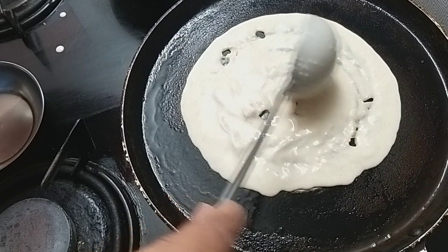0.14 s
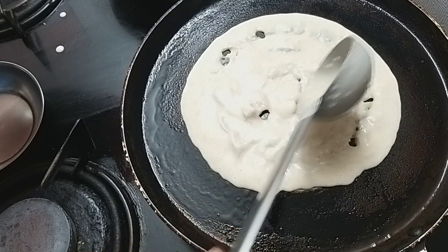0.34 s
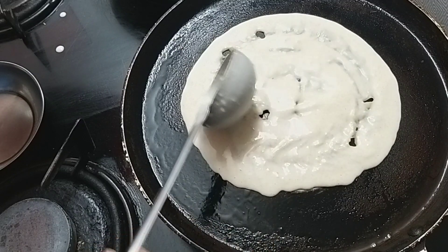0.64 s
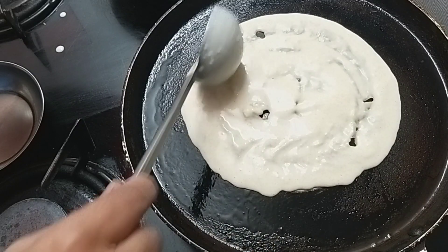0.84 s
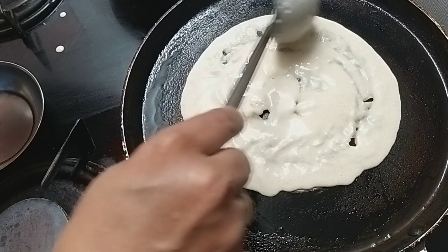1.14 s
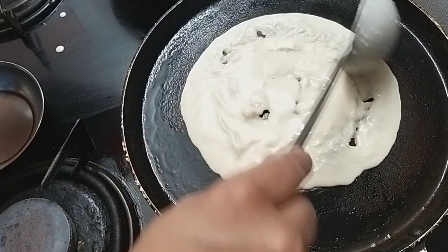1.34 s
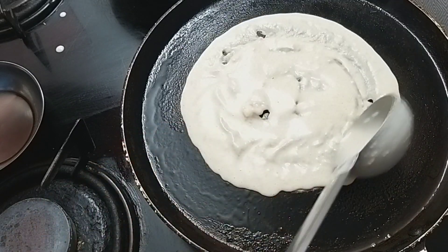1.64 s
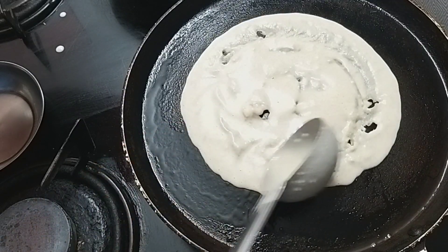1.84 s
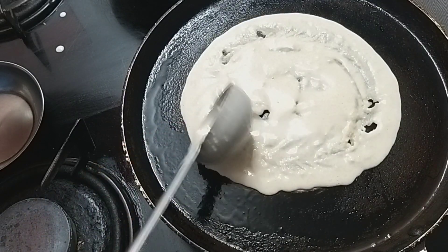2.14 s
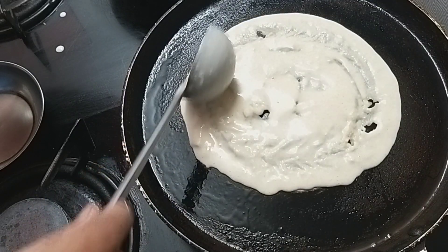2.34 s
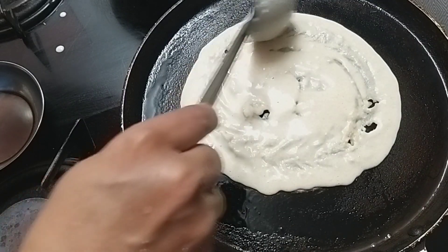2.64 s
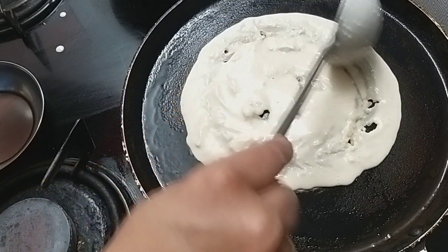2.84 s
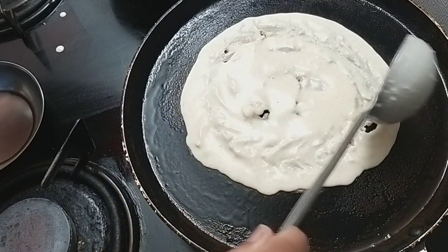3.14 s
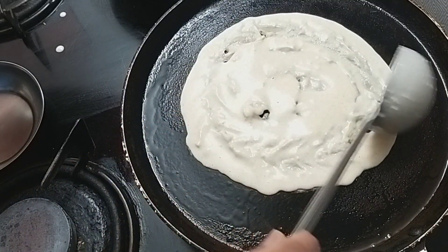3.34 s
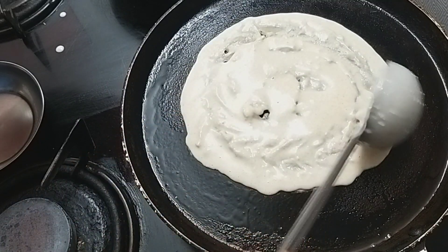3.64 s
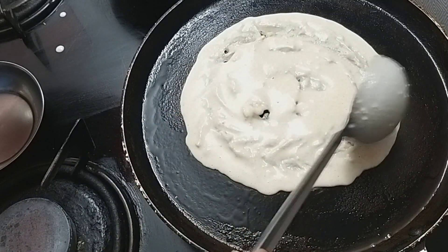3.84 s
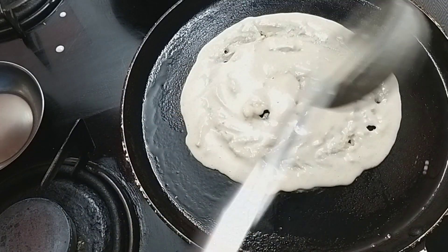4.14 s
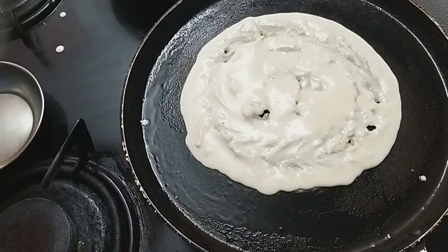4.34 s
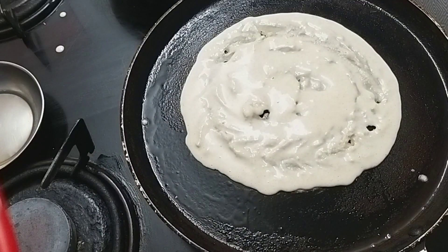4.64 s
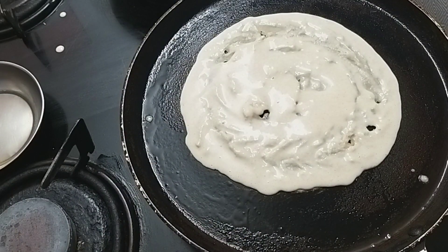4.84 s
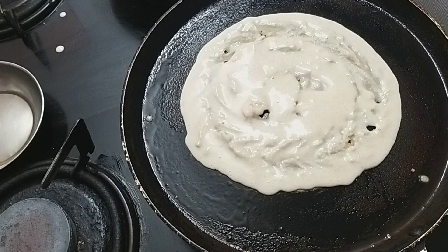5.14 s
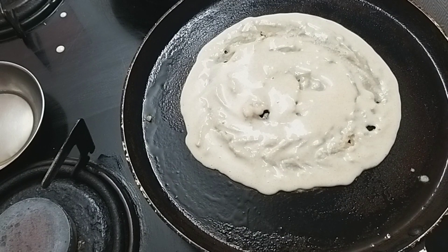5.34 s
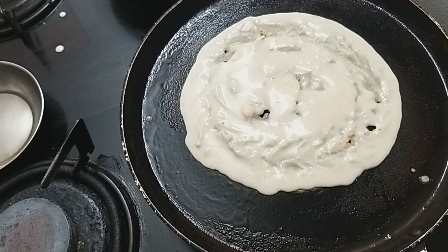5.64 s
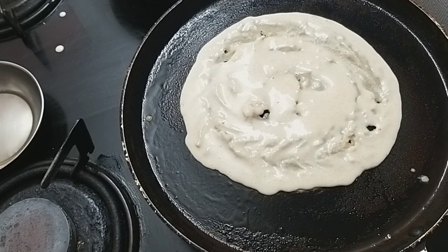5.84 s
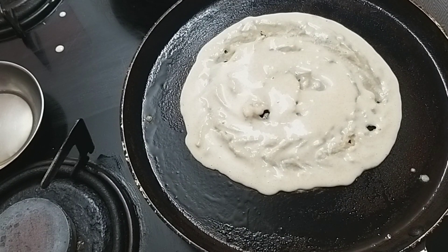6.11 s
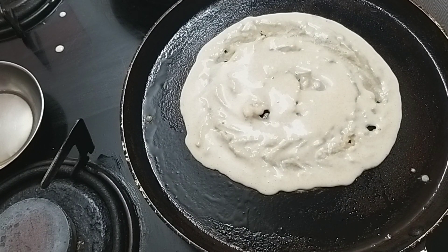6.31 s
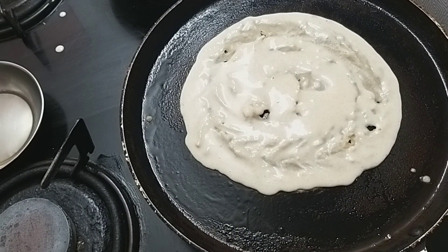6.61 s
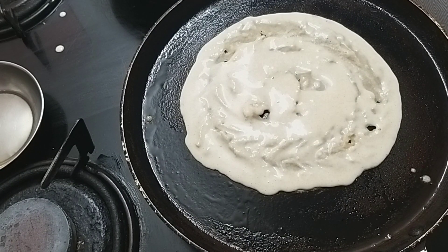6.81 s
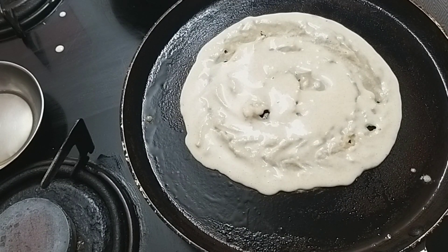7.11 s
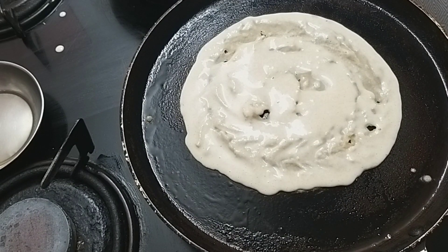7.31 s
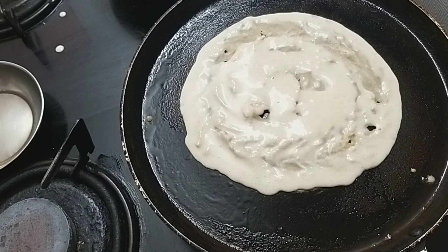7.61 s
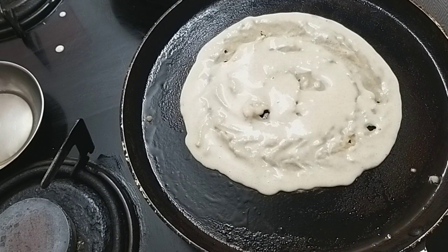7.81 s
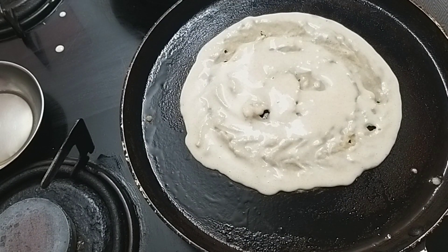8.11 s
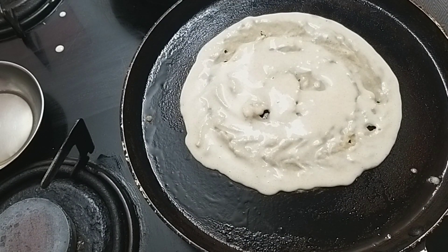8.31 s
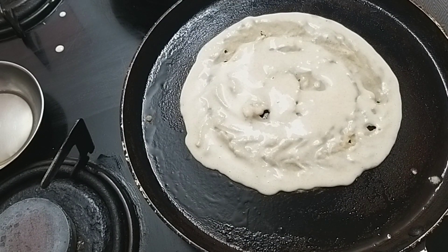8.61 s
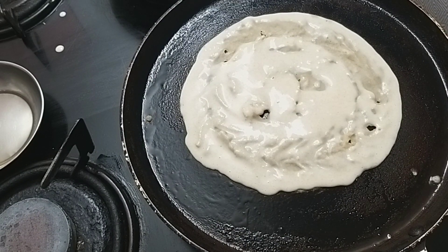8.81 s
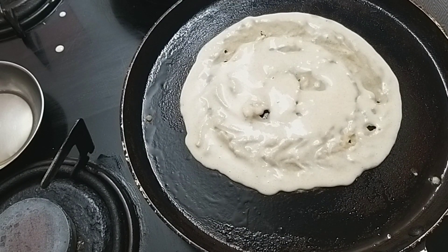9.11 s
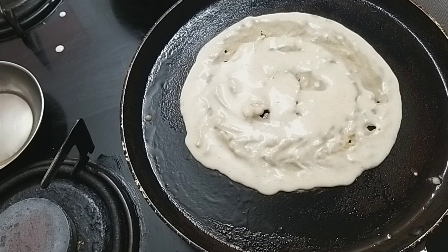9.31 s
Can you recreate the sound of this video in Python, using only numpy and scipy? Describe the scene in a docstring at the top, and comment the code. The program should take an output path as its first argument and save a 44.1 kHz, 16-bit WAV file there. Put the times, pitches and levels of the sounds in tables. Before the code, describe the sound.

A near stereo microphone catches strong, crisp sizzling and bubbling batter, with faint wet ladle smears and brief hoarse steam hisses in the first few seconds. The frying then weakens, leaving popping, spitting oil more exposed. From midway, irregular hollow clacks, small steel ticks and dull counter thumps sound nearby in the lightly reverberant kitchen. A quiet low rush continues underneath, and a much louder knock lands at the very end.

```python
"""Batter fries on a hot oiled griddle, close to the microphone in a small kitchen, as a steel ladle spreads it.
Steam bursts through the oil: clicks and chirps make a dense fizz, and clustered clicks make short spurts.
The spurts stand out as the batter sets and the fizz dies down; sharp spits of oil are noise bursts.
The ladle smears (filtered clicks) and traps rasping steam (swept noise), then is taken away.
Then things are knocked and put down on the counter (decaying modes), over the kitchen's low rush of noise."""
import sys
import numpy as np
from scipy import signal
from scipy.fft import rfft, irfft
from scipy.io import wavfile
from scipy.ndimage import uniform_filter1d

SR = 44100
rng = np.random.default_rng(int(sys.argv[2]) if len(sys.argv) > 2 else 0)


def transcribe(signal):
    """Save signal, clipped to [-1, 1], as a 16-bit WAV file at the path in sys.argv[1]."""
    frames = np.atleast_2d(signal).T
    limited = np.clip(frames, -1, 1)
    pcm = np.round(limited * 32767).astype(np.int16)
    wavfile.write(sys.argv[1], SR, pcm)


N = 417178  # samples
TIME = np.arange(N) / SR  # seconds

# Steam flow out of the batter; only its rise or fall from STEADY_STEAM_DB is used.
# Each row: time in seconds, flow as a level in dB.
STEAM_FLOW = [(0, -38), (.12, -37), (.3, -39), (.8, -39.5), (.95, -41), (1.02, -36.5), (1.21, -41),
              (1.5, -40), (1.76, -35.5), (2.2, -38), (2.62, -34.5), (3.25, -38), (3.7, -42), (3.83, -43.5),
              (3.91, -42.5), (4.02, -43.5), (4.36, -46.5), (4.45, -39), (4.7, -40.5), (4.8, -44.5),
              (5.5, -42.5), (6.45, -45.5), (6.72, -52), (6.9, -46.5), (7.15, -49), (7.33, -48), (7.42, -52),
              (7.8, -48), (7.95, -49.5), (8.3, -53), (8.88, -52.5), (9.1, -47), (9.42, -43.5)]
# Gain of the wet boiling at steady steam. Each row: time in seconds, gain in dB.
BOILING_GAIN = [(0, -48.5), (1.4, -44.5), (1.55, -44.5), (1.8, -45.5), (2.1, -44.5), (3.3, -44.5),
                (4.35, -47), (4.5, -48.5), (5.3, -48), (6.3, -48), (9.42, -46.5)]
# Tone of each frying layer, as filters. Each row: frequency in Hz, relative gain in dB.
FIZZ_TONE = [(1500, -22), (3500, -8), (5000, -4), (6200, -5), (7500, -1.5), (10000, -3), (12800, 0),
             (14500, -1.7), (16000, -1.7)]
BOIL_TONE = [(200, -26.5), (400, -18.5), (510, -4.5), (660, -15.5), (950, -4), (1290, -4), (1500, 0),
             (2200, 0), (3300, 2.5), (4500, 2.5), (6500, -7), (12000, -40)]
SPURT_TONE = [(400, -27), (1200, -18.5), (3300, -8.5), (6000, -6), (7500, -2.5), (10000, -3.3),
              (12800, -.5), (16000, -3)]
SNAP_TONE = [(1500, -28), (4000, -16), (6000, -9), (7500, -5.5), (10000, -7.5), (12800, -1), (16000, -7)]
SPLUTTER_TONE = [(250, -38), (700, -15), (1400, -7), (3500, 2.5), (5500, 4.5), (9000, -4), (16000, -42)]
# Bands in which a spurt is stronger or weaker. Each row: lower edge in Hz, upper edge in Hz.
PATCHY_BANDS = [(900, 2200), (2200, 4400), (4400, 7500), (7500, 11000), (11000, 17000)]
# Loudest spits of oil, before SPIT_GAIN_DB. Each row: time in seconds, snap energy as a level over 1 ms in dB,
# snap length in seconds (SPIT_CORE scales its decay), wet splutter relative to the snap in dB.
OIL_SPITS = [(0.096, -26, 0.00076, -17.0), (0.1371, -22.5, 0.00068, -15.0), (0.214, -31, 0.00044, -13.0),
             (0.306, -29, 0.00079, -13.0), (0.613, -38, 0.00036, -18.5), (0.7073, -25, 0.00175, -18.0),
             (0.774, -24.5, 0.0012, -3.5), (0.908, -32, 0.00016, -8.0), (1.1398, -34, 0.00039, -6.5),
             (1.372, -25, 0.001, -9), (1.395, -25.5, 0.0018, -22.0), (1.4673, -31, 0.00052, -4),
             (1.634, -22.5, 0.00096, -8), (1.752, -24.5, 0.00062, -12), (1.9591, -27, 0.00037, -8.0),
             (2.114, -27, 0.00082, -22.0), (2.552, -25, 0.00058, -22), (2.649, -24, 0.00037, -2),
             (3.3787, -29, 0.00067, -13.0), (3.442, -32, 0.00021, -22.0), (3.546, -26.5, 0.00063, 3),
             (3.5746, -38, 0.0003, -10.0), (3.731, -31, 0.00071, -10.0), (3.8401, -37, 0.00051, -22.0),
             (3.894, -31, 0.00067, -8.0), (3.907, -25.5, 0.0016, -11), (3.978, -36, 0.00053, -12.0),
             (4.07, -28, 0.00056, -5), (4.126, -25.5, 0.0015, -7), (4.139, -30, 0.00116, -12.0),
             (4.2764, -32, 0.00091, -4), (4.293, -35, 0.0012, -4), (4.508, -21, 0.00041, -24),
             (4.5132, -30, 0.00028, -17.0), (4.599, -31, 0.00088, 1), (4.696, -27, 0.00037, -1),
             (4.766, -28, 0.0016, -1), (4.872, -27.5, 0.00056, -7.0), (4.929, -27.5, 0.00065, -15),
             (4.955, -33.5, 0.00035, 1.5), (5.018, -32, 0.00098, -4), (5.0245, -28.0, 0.00096, -4.0),
             (5.0764, -35, 0.00038, -4), (5.115, -32.5, 0.00036, -22.0), (5.13, -29.5, 0.0011, -5),
             (5.183, -34, 0.00087, -3), (5.2954, -28.5, 0.00085, -2.5), (5.32, -39, 0.00146, -16.0),
             (5.339, -27, 0.00063, -13), (5.405, -32, 0.00059, -10.0), (5.436, -37, 0.00017, 0),
             (5.4871, -28.5, 0.00082, -0.5), (5.531, -28.5, 0.001, -2), (5.584, -33, 0.00056, -11),
             (5.603, -31, 0.00051, -20), (5.6776, -33, 0.00087, -21.0), (5.745, -31.5, 0.00073, 7),
             (5.784, -32.0, 0.00052, -22.0), (5.8231, -26, 0.0012, -10), (5.959, -31, 0.00033, -4.0),
             (5.983, -31.5, 0.00032, -20.0), (6.0214, -28.5, 0.00067, -3.5), (6.0422, -23, 0.0011, -5.0),
             (6.0532, -38, 0.00049, -10.0), (6.105, -23, 0.0011, -22), (6.12, -38, 0.00045, -11),
             (6.14, -34, 0.00047, -12), (6.187, -32.5, 0.00031, -22.0), (6.233, -21.5, 0.0005, -10),
             (6.2475, -29, 0.00038, -6), (6.2996, -28.5, 0.00051, -0.5), (6.328, -33, 0.00015, -17.0),
             (6.3415, -30, 0.00022, -2), (6.383, -32, 0.00084, -19.0), (6.431, -30.5, 0.00068, -9),
             (6.557, -33.5, 0.00177, -3), (6.591, -32, 0.001, -15.0), (6.602, -30, 0.00065, -12.0),
             (6.607, -33.0, 0.0011, -19.0), (6.6426, -31, 0.00012, -20.0), (6.655, -31, 0.00038, -8),
             (6.667, -31.5, 0.00198, -6), (6.865, -26.0, 0.00034, -9), (6.877, -33.0, 0.00057, -15.0),
             (6.9034, -33, 0.00021, -13), (6.915, -26, 0.00057, -12), (6.9374, -32, 0.00078, -24),
             (6.9476, -25.5, 0.00032, -13), (6.957, -32.0, 0.0011, -22.0), (6.9843, -32.5, 0.00051, 1.5),
             (7.0336, -36.5, 0.00027, 0), (7.088, -30, 0.00048, -2), (7.0988, -37, 0.00035, -7),
             (7.1159, -35, 0.00104, -3), (7.1263, -31, 0.00051, -4), (7.247, -28.5, 0.00053, -13),
             (7.3175, -35, 0.00059, -22.0), (7.331, -36.5, 0.00089, 4), (7.3393, -36, 0.00086, -9.0),
             (7.435, -38, 0.00021, -17.0), (7.497, -33, 0.00032, -7), (7.6551, -34.5, 0.0008, -17.0),
             (7.6917, -36, 0.00093, -10.0), (7.714, -30, 0.00041, -6), (7.759, -33, 0.00051, -2),
             (7.78, -34, 0.00023, -6), (7.811, -34, 0.00029, 1.5), (7.838, -29, 0.00075, -5),
             (7.849, -31, 0.00048, -14), (7.8651, -35, 0.00077, -14), (7.993, -34.5, 0.00046, -14),
             (8.029, -35, 0.00078, -13.0), (8.033, -34, 0.0005, -9), (8.059, -32, 0.00074, -15),
             (8.124, -38, 0.00047, -22.0), (8.16, -32, 0.00086, -10), (8.267, -33.5, 0.00029, -15),
             (8.3533, -30, 0.0021, -4), (8.3658, -36, 0.00041, -7), (8.374, -34, 0.00133, -13.0),
             (8.469, -35.5, 0.00056, -1), (8.492, -34, 0.0018, -2), (8.5076, -31, 0.0012, 1.5),
             (8.525, -28, 0.0002, -7), (8.5517, -26.5, 0.00071, -8), (8.589, -31.0, 0.00049, -1),
             (8.6144, -33, 0.00105, -18.0), (8.656, -31, 0.00074, -13), (8.6995, -26.5, 0.00056, -6),
             (8.713, -31, 0.0004, -15.0), (8.926, -33.5, 0.00072, -16.0), (8.963, -26.0, 0.00025, -21),
             (8.9715, -31, 0.00036, -12.0), (9.0489, -41, 0.0006, -22.0), (9.096, -30, 0.00112, -15.0),
             (9.1678, -33, 0.0013, -5), (9.343, -23.5, 0.00082, -7), (9.3928, -32, 0.00041, -7)]
# Ladle strokes through the batter. Each row: middle in seconds, length in seconds, level in dB.
LADLE_STROKES = [(0.186, 0.11, -52.5), (0.47, 0.26, -60), (0.76, 0.066, -45.5), (1.054, 0.049, -49.5),
                 (1.423, 0.18, -44.5), (1.587, 0.06, -48.5), (1.8, 3.7, -56), (2.118, 0.13, -45),
                 (2.208, 0.11, -46), (2.54, 0.69, -56), (3.003, 0.11, -47.5), (3.919, 0.038, -51)]
# Tone of the ladle's smear, as a filter. Each row: frequency in Hz, relative gain in dB.
SMEAR_TONE = [(150, -30.5), (270, 1.5), (420, -1.5), (510, 9), (640, -1.5), (900, 2.5), (1250, 1),
              (2000, -4), (4000, -38)]
# Steam trapped under the bowl. Each row: start in seconds, attack in seconds, time from start to release in
# seconds, release time constant in seconds, starting resonance in Hz, sag in octaves per second,
# level in dB before the rasp.
TRAPPED_STEAM = [(0.106, 0.0092, 0.024, 0.014, 3460, .4, -37.5),
                 (1.545, .015, 0.29, 0.03, 4350, 1.1, -35.5), (1.95, .01, 0.076, 0.043, 3750, 0.38, -42.5),
                 (2.282, .01, 0.14, 0.081, 2350, .4, -45), (2.536, .02, 0.06, 0.26, 3426, .4, -39.5)]
# Blows on the counter. Each row: time in seconds, clack peak in dB, body pitch in Hz, tilt of the body's modes
# in dB per octave (higher is harder), then gains in dB of the body, the steel ring and the counter's thump.
COUNTER_KNOCKS = [(5.5408, -22, 665, 5, -35, -49, -34), (5.5472, -21, 819, 1, -31, -50, -25.5),
                  (5.7314, -18.5, 617, 6, -33.5, -36.5, -36), (5.838, -48, 280, 2, -50, -66, -46),
                  (6.2123, -18, 759, 0, -22.5, -50, -37), (6.6988, -32, 266.5, 7.5, -36.5, -67, -54),
                  (6.712, -44, 215, -7, -39, -68, -35), (6.768, -41, 239, 3, -45, -66, -43),
                  (6.9734, -21.5, 910, 3, -47, -55, -50), (7.005, -33, 521, 3, -48, -53, -58),
                  (7.2409, -18, 396.4, -6, -20.5, -53, -35.5), (7.2747, -25, 423, -1, -44, -60, -62),
                  (7.3302, -30, 388, -1, -35, -67, -60), (7.429, -30, 804, -5, -38.5, -55, -53),
                  (7.5439, -16, 493, 1.5, -25, -40.5, -42.5), (7.762, -52, 411, -14, -42.5, -68, -56),
                  (8.1616, -28.5, 800, 0, -39, -58, -43), (8.19, -28, 520, 0, -45, -45, -48),
                  (8.8532, -47, 773, -10, -47, -68, -42), (9.1232, -32, 279, 6, -48, -65, -42),
                  (9.4525, -0.5, 815, 3, -19, -19, -31)]
# Tone of the contact clack, as a filter. Each row: frequency in Hz, relative gain in dB.
CLACK_TONE = [(40, -47), (120, -21), (300, 1), (550, -17), (820, 6), (1100, 0.5), (1500, 3.5), (2100, -1),
              (3000, -4), (5000, -7.5), (10000, -10), (16000, -52)]
# Modes of a thing put down. Each row: multiple of its pitch, level in dB, t60 in seconds.
VESSEL_MODES = [(.6, -10, .07), (.75, -10.5, .07), (.93, -7, .08), (1, 0, .125), (1.09, -9, .14),
                (1.36, -9, .11), (1.62, -15, .14), (1.95, -18, .14), (2.3, -17, .12), (2.8, -21, .11),
                (3.2, -19, .13), (3.9, -24, .1)]
# Modes of the steel ladle and cup. Each row: frequency in Hz, level in dB, t60 in seconds.
STEEL_MODES = [(1104, -9, 0.18), (1320, -14, 0.042), (1670, -25, 0.039), (1660, -18, 0.057),
               (1740, -1, 0.033), (2087, -3.5, 0.087), (2023, 5.5, 0.032), (2280, 1.5, 0.037),
               (2560, -15, 0.11)]
# Modes of the counter, all sounded at 0.98 of the listed pitch.
# Each row: nominal frequency in Hz, level in dB, t60 in seconds.
COUNTER_MODES = [(122, -17, 0.83), (156.3, 2, 0.28), (182, -3, 0.24), (215, -8, 0.17), (276, -9, .09)]
# Tone of the burner and room, as a filter. Each row: frequency in Hz, relative gain in dB.
KITCHEN_TONE = [(25, -7.5), (60, -3.5), (110, 3), (160, -3), (230, -9.5), (400, -10.5), (510, -9.5),
                (700, -10), (1000, -10), (1280, -3.5), (1600, -15), (4000, -24.5), (16000, -53)]

# layer levels in dB at steady steam, before the room; a slope is the dB gained per dB more steam
STEADY_STEAM_DB = -44
FIZZ_DB, FIZZ_SLOPE = -42.5, 1.21
CRACKLE_DB, CRACKLE_SLOPE = -49, .95
SPURT_DB, SPURT_SLOPE = -47.5, 0.59
BOIL_SLOPE = 0.77
FLURRY_DB = 1.4  # slow swell and ebb of the fizz and boil
SPURT_LENGTH_S = .0009  # typical scale of a venting steam pocket
SPURT_RANGE_DB, SPURT_RARITY = 7.5, 2.2  # higher rarity: fewer loud spurts
SPIT_GAIN_DB = 3.5
SPIT_CORE, SPIT_TAIL_DB, SPIT_TAIL_S, SPLUTTER_S = .68, -19, .003, 0.0034
RATTLE_DB, RATTLE_T60_S = -27, 0.2  # chatter after a contact, relative to its first click
CHATTER_DEPTH, CHATTER_HZ = .5, 130
EAR_LAG_S = .00036
THUMP_ATTACK_S = 0.0059
KITCHEN_DB = -53
TOP_HZ = 16100


def frying(count=900):
    """Fizz, cracks and boiling fade with the steam; spurts fade less, and spits keep their own levels."""
    steam_db = curve(STEAM_FLOW) - STEADY_STEAM_DB
    fine = fizz(count=140000, spread_db=-1.0, flutter_db=1.0, flurry_db=FLURRY_DB)
    fine = unit(colour(fine, FIZZ_TONE)) * undb(FIZZ_DB + FIZZ_SLOPE * steam_db)
    boil = fizz(count=60000, spread_db=2.5, flutter_db=0.0, flurry_db=FLURRY_DB)
    wet = unit(colour(boil, BOIL_TONE)) + undb(-7.0) * bubbles(count=2200, spread_db=14, cycles=43.0)
    wet = wet * undb(curve(BOILING_GAIN) + BOIL_SLOPE * steam_db)
    # steam pockets vent at loosely spaced moments, most of them small
    times = (np.arange(count) + 7 * rng.random(count)) / count % 1 * N / SR
    sizes = undb(SPURT_RANGE_DB * rng.random(count) ** SPURT_RARITY)
    vents = unit(spurts(times, sizes, SPURT_LENGTH_S, scatter=.6, patchy_db=4.5))
    vents = vents * undb(SPURT_DB + SPURT_SLOPE * steam_db)
    cracks = crackle() * undb(CRACKLE_DB + CRACKLE_SLOPE * steam_db)
    return sum(room(layer, wet_db=-10, t60=.2) for layer in (fine, cracks, wet, vents, spits()))


def fizz(count, spread_db, flutter_db, flurry_db):
    """Countless tiny bubbles click all over the pan, with a quick flutter and slower flurries."""
    when, luck = rng.random((2, count))
    sign, place = rng.standard_normal((2, count))
    size = np.sign(sign) * undb(-spread_db * np.log(np.maximum(luck, np.exp(-6))))
    level_db = flutter_db * walk(260) + flurry_db * walk(50)
    return pops(when * N / SR, size, place) * undb(level_db)


def crackle(count=7000):
    """Single small bubbles crack in the oil, each for two or three cycles at its own pitch; a few stand out."""
    out, t = np.zeros((2, N)), np.arange(SR // 200) / SR
    for when, size, luck, place in rng.random((count, 4)):
        hz = 1500 + 13500 * size ** 1.3
        gain = max(luck, .02) ** -.45 * hz ** .7
        grain = np.sin(2 * np.pi * hz * t) * np.exp(-hz * t / 2.5) * gain
        add(out, when * N / SR, np.array([grain, np.roll(grain, int(9 * place))]))
    return unit(signal.sosfilt(signal.butter(2, 1500, "high", fs=SR, output="sos"), out))


def bubbles(count, spread_db, cycles):
    """Small bubbles in the wet batter, each a decaying chirp that rises from its own pitch."""
    out, t = np.zeros((2, N)), np.arange(SR // 80) / SR
    for when, size, loud, place in rng.random((count, 4)):
        hz = 2200 * 2 ** (2.32 * size)
        chirp = np.sin(2 * np.pi * hz * t * (1 + 12 * t))
        chirp = chirp * np.exp(-hz * t / cycles) * undb(spread_db * loud)
        add(out, when * N / SR, np.array([chirp, np.roll(chirp, int(8 * place))]))
    return unit(out)


def spurts(times, sizes, length, scatter, patchy_db, count=24):
    """Steam pockets vent as clusters of clicks, each with its own length, place and strong bands."""
    chance = rng.standard_normal((len(times), 2))
    lengths, out = length * np.exp(scatter * chance[:, :1]), 0
    for band in PATCHY_BANDS:
        spread = rng.laplace(size=(len(times), count))
        size = rng.uniform(-0.55, 1, spread.shape) * np.exp(-.5 * np.abs(spread)) * np.sqrt(lengths)
        size = size * sizes[:, None] * undb(patchy_db * rng.uniform(-0.79, 1, (len(times), 1)))
        place = .7 * chance[:, 1:] + .5 * rng.standard_normal(spread.shape)
        clicks = pops((times[:, None] + lengths * spread).ravel(), size.ravel(), place.ravel())
        out = out + signal.sosfilt(signal.butter(2, band, "band", fs=SR, output="sos"), clicks)
    return colour(out, SPURT_TONE)


def spits():
    """A droplet bursts in the oil: a bright snap with a hard front and a faint tail, and a wet splutter."""
    snaps, splutters, t = np.zeros((2, N)), np.zeros((2, N)), np.arange(SR // 40) / SR
    lead, rise = .002, .00012  # seconds
    after = np.maximum(t - lead, 0)
    front = np.exp(np.minimum(t - lead, 0) / rise)
    one_ms_scale = np.sqrt(SR / 1000 / len(t))
    for s, db, length, wet_db in OIL_SPITS:
        rebound, film = rng.random(2)
        noise = rng.standard_normal((3, len(t)))
        # the film's rebound, a few samples late, colours each spit differently
        noise = noise + .7 * (2 * rebound - 1) * np.roll(noise, 2 + int(5 * film), axis=1)
        ears = np.array([.9 * noise[0], 1.1 * np.roll(noise[0], 4)]) + .5 * noise[1:]
        core = np.exp(-after / (2 * SPIT_CORE * length))
        tail = undb(SPIT_TAIL_DB) * np.exp(-after / SPIT_TAIL_S)
        snap = colour(ears * front * (core + tail), SNAP_TONE)
        # the same noise reversed in time feeds the splutter
        splutter = colour(ears[:, ::-1] * front * np.exp(-after / SPLUTTER_S), SPLUTTER_TONE)
        start = s - lead - length / 2
        add(snaps, start, unit(snap) * one_ms_scale * undb(db + SPIT_GAIN_DB))
        add(splutters, start, unit(splutter) * one_ms_scale * undb(db + wet_db + SPIT_GAIN_DB))
    return snaps + splutters


def pops(s, size, place):
    """Bursting bubbles as clicks; the place on the pan sets the lag and balance between the ears."""
    out = np.zeros((2, N))
    lag = np.round(3.8 - 2.1 * place)  # samples by which the right ear hears it later
    for ear, at, gain in ((0, s * SR, undb(-1.5 * place)), (1, s * SR + lag, undb(0.77 * place))):
        out[ear] = np.bincount(at.astype(int) % N, size * gain, N)
    return out


def ladle():
    """The bowl drags in tiny catches and slips; each stroke comes on quickly, holds and lifts off."""
    pressure = sum(undb(db) * np.exp(-(2 * (TIME - s) / length) ** 4) for s, length, db in LADLE_STROKES)
    slips = fizz(count=9000, spread_db=1.5, flutter_db=2.6, flurry_db=1.8)
    return unit(room(colour(slips, SMEAR_TONE), wet_db=-4.5, t60=0.12)) * pressure


def trapped_steam(half_width_hz, rasp_db):
    """Steam caught beneath the bowl rasps in the gap: it swells, holds, and sinks in pitch as the gap opens."""
    noise = rng.standard_normal((2, N)) + 1j * rng.standard_normal((2, N))
    gap = signal.sosfilt(signal.butter(4, half_width_hz, fs=SR, output="sos"), noise)
    out = np.zeros((2, N))
    for s, attack, hold, release, hz, sag, db in TRAPPED_STEAM:
        age = np.maximum(TIME - s, 0)
        flow = np.sqrt(np.minimum(age / attack, 1)) * np.exp(-np.maximum(age - hold, 0) / release)
        # turning the low noise moves it up to the sagging resonance
        turn = np.exp(2j * np.pi * np.cumsum(hz * 2 ** (-sag * age)) / SR)
        out += unit((gap * turn).real) * flow * undb(db)
    return out * undb(rasp_db * walk(350))


def knocks():
    """Each blow: a contact clack with a short chatter, the thing's body, a steel ring and the counter's thump."""
    blows, thumps, t = np.zeros((2, N)), np.zeros((2, N)), np.arange(SR // 2) / SR
    settle = undb(RATTLE_DB - 60 * t / RATTLE_T60_S)
    for s, clack_db, hz, tilt_db, body_db, steel_db, thump_db in COUNTER_KNOCKS:
        noise = rng.standard_normal((3, len(t)))
        clack = colour((t == 0) + settle * (noise[0] + noise[1:]), CLACK_TONE)
        add(blows, s, clack / np.abs(clack).max() * undb(clack_db))
        # a harder contact favours the upper modes; the body is weak below its lowest
        modes = [(f, db + tilt_db * np.log2(f), t60) for f, db, t60 in VESSEL_MODES]
        body = ring(modes, hz, t) * chatter(t) * (1 - np.exp(-t * hz)) * undb(body_db)
        body = signal.sosfilt(signal.butter(2, hz / 3, "high", fs=SR, output="sos"), body)
        # the body reaches the left ear first
        add(blows, s, np.array([[1], [0]]) * body)
        add(blows, s + EAR_LAG_S, np.array([[0], [.85]]) * body)
        add(blows, s, ring(STEEL_MODES, 1.0, t) * undb(steel_db))
        # the heavy counter takes a moment to get moving
        thump = ring(COUNTER_MODES, 0.98, t) * (1 - np.exp(-t / THUMP_ATTACK_S))
        add(thumps, s, thump * undb(thump_db))
    return room(blows, wet_db=-10, t60=.3) + thumps


def ring(modes, pitch, t):
    """Decaying modes, all set swinging at once by a blow."""
    return sum(undb(db - 60 * t / t60) * np.sin(2 * np.pi * f * pitch * t) for f, db, t60 in modes)


def chatter(t):
    """A thing that has not settled yet: its ringing wavers quickly in strength."""
    wobble = signal.sosfilt(signal.butter(2, CHATTER_HZ, fs=SR, output="sos"), rng.standard_normal(len(t)))
    return 1 + CHATTER_DEPTH * unit(wobble)


def kitchen():
    """The low rush of the burner and the room: filtered noise that wavers slightly in level."""
    return unit(colour(air(apart_hz=880), KITCHEN_TONE)) * undb(KITCHEN_DB + walk(2.8))


def air(apart_hz):
    """Stereo noise, alike in both ears in the bass and unrelated above apart_hz."""
    mid, side = rng.standard_normal((2, N))
    side = signal.sosfilt(signal.butter(1, apart_hz, "high", fs=SR, output="sos"), side)
    return np.array([mid + side, mid - side])


def room(x, wet_db, t60):
    """The direct sound and a dense tail from hob, tiles and walls."""
    t = np.arange(SR // 2) / SR
    tail = rng.standard_normal((2, len(t))) * undb(-60 * t / t60) * (t > .001)
    tail /= np.sqrt(np.sum(tail ** 2, axis=1, keepdims=True))
    return x + undb(wet_db) * signal.oaconvolve(x, tail, axes=1)[:, :N]


def colour(x, points):
    """Causal minimum-phase filter through (Hz, dB) points."""
    size = 2048
    hz, db = np.transpose(points)
    log_gain = np.log(undb(np.interp(np.log(rfft_hz(size) + 1), np.log(hz), db)))
    # folding the cepstrum forward in time makes the filter causal
    fold = np.r_[1, np.full(size // 2 - 1, 2), 1, np.zeros(size // 2 - 1)]
    response = irfft(np.exp(rfft(irfft(log_gain) * fold)))
    return signal.oaconvolve(x, response[None], axes=1)[:, :x.shape[1]]


def rfft_hz(size):
    """Frequencies of a spectrum's bins."""
    return np.arange(size // 2 + 1) * SR / size


def walk(rate):
    """Random levels held 1 / rate s and smoothed twice; spread near 1."""
    hold = int(SR / rate)
    steps = np.repeat(rng.standard_normal(N // hold + 1), hold)
    return 1.5 * uniform_filter1d(uniform_filter1d(steps, hold), hold)[:N]


def curve(rows):
    """Join (s, value) rows by straight lines."""
    return np.interp(TIME, *np.transpose(rows))


def undb(db):
    """Decibels to gain."""
    return 10 ** (np.asarray(db) / 20)


def unit(x):
    """Scale to rms 1."""
    return x / np.sqrt(np.mean(x ** 2))


def add(out, s, sound):
    """Mix a sound in at time s."""
    i = int(np.clip(s * SR, 0, N - 1))
    out[:, i:i + sound.shape[-1]] += sound[..., :N - i]


def scene():
    """Pan, counter and room, all a little louder in the right ear."""
    pan = frying() + ladle() + trapped_steam(half_width_hz=720, rasp_db=3.2)
    return (pan + knocks() + kitchen()) * undb(np.array([[-.3], [.3]]))


def record(dry):
    """The microphone chain softly rounds the loudest peaks and cuts the treble above TOP_HZ."""
    ceiling = .9
    rounded = ceiling * np.tanh(dry / ceiling)
    return signal.sosfilt(signal.ellip(10, .2, 70, TOP_HZ, fs=SR, output="sos"), rounded)


dry = scene()
out = record(dry)
transcribe(out)
```